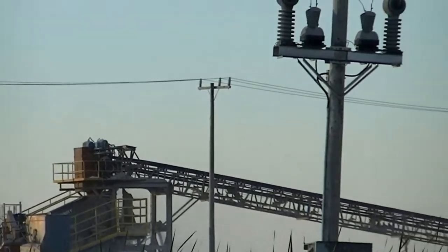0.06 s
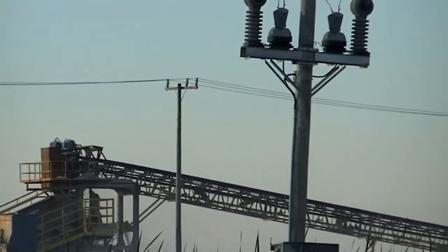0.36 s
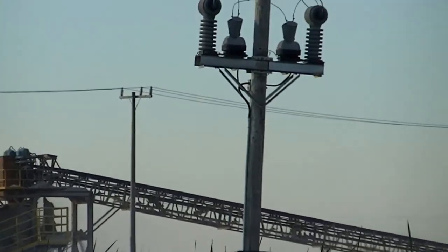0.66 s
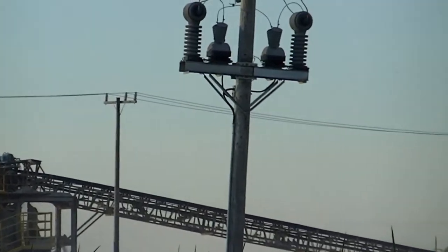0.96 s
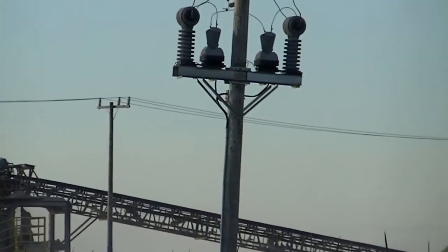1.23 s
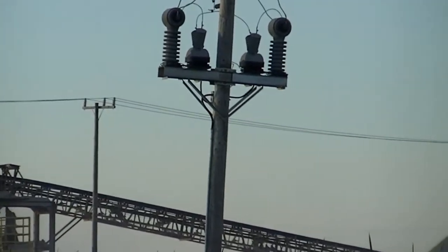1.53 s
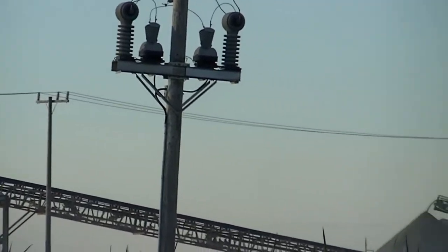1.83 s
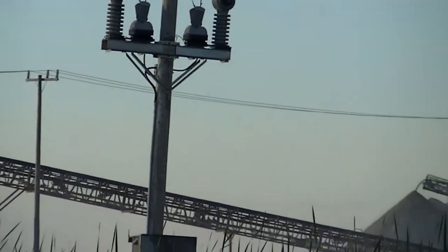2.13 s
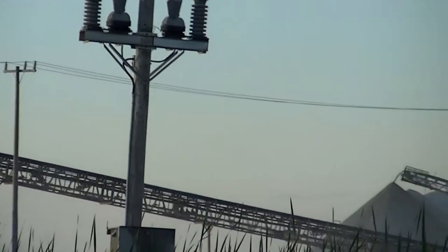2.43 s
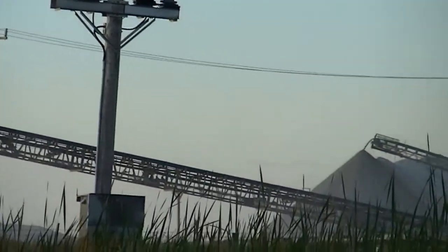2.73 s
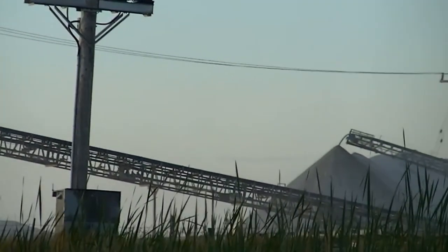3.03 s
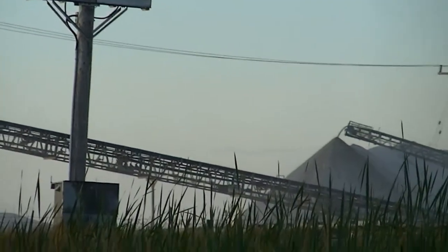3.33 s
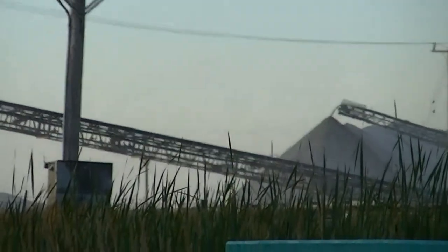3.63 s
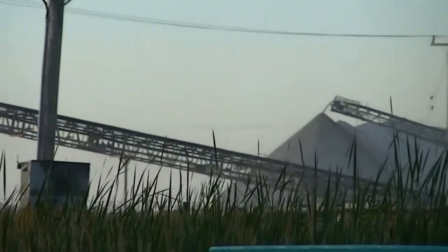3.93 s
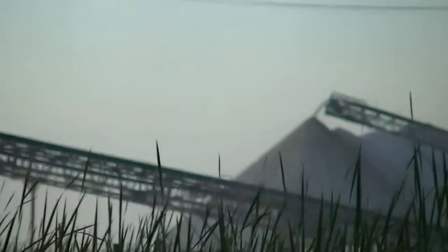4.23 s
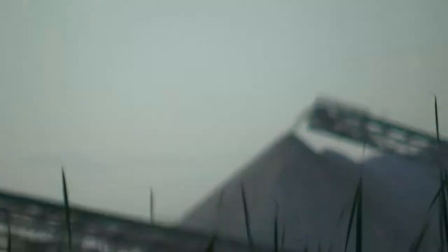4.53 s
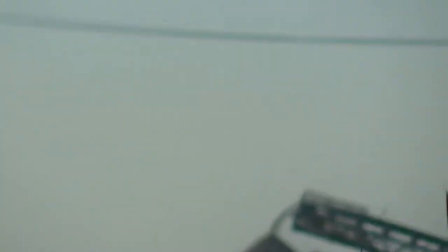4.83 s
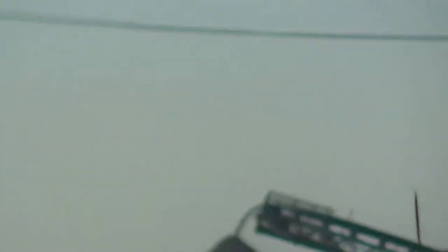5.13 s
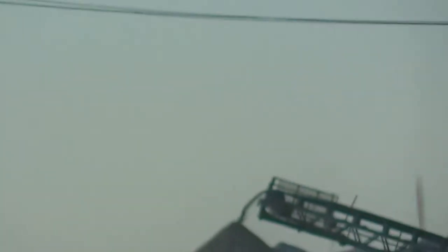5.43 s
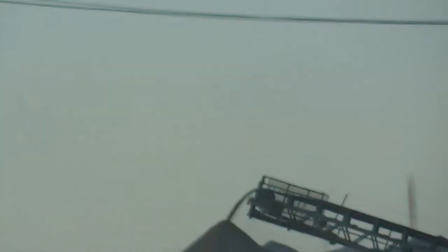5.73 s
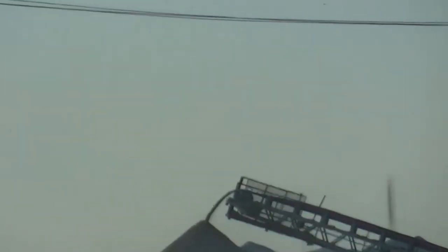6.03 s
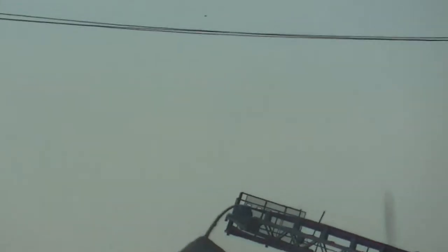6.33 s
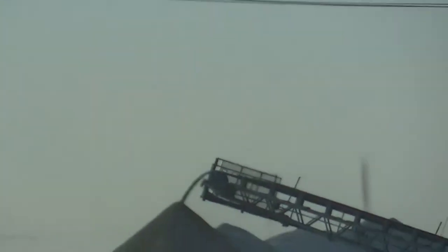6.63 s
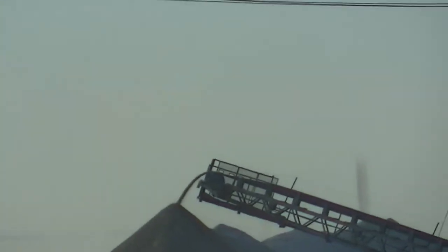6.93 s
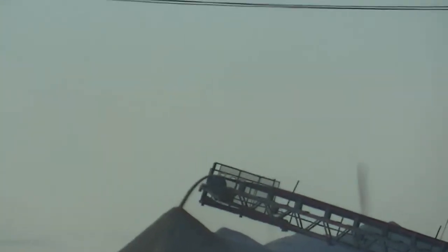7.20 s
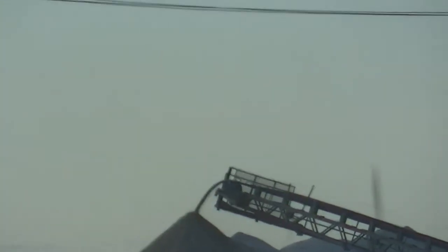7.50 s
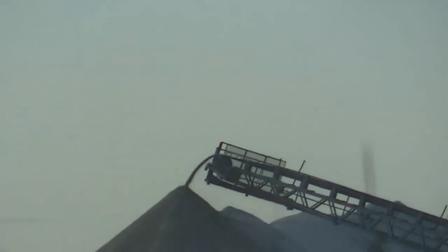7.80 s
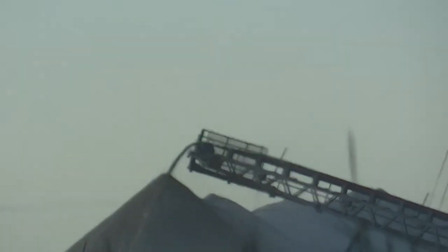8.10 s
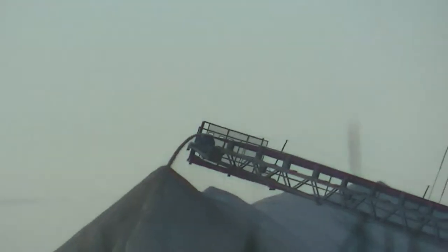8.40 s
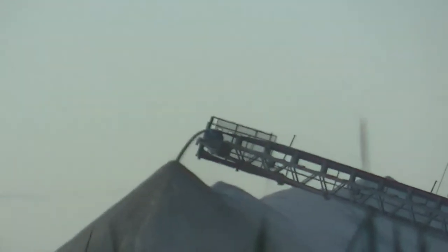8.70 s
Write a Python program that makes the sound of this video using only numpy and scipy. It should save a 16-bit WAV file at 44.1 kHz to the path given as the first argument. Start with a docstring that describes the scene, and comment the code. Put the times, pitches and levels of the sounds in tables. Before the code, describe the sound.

Outdoors at a gravel pit, machinery rumbles at a distance while stones clatter on a shaking screen and gravel and hissing grit pour off conveyor belts. A few pebbles ping and skitter. After about four seconds the din grows louder and narrows to the centre, with a faint high whine. Two small clicks sound near the microphone, the second with a rock's knock.

```python
"""Gravel plant across open ground

Steel frames rumble under the chug of stones on a shaking screen, while gravel and hissing grit pour off the
belts. Pebbles ping and skitter, a chute rings, brief midrange rings accent the clatter and one rock knocks on
the deck. After four seconds the whole sound grows louder and narrows to the centre, and a faint friction whine
rises with it. Two small clicks sound close by."""
import sys
import numpy as np
from scipy import signal
from scipy.fft import rfft, irfft
from scipy.io import wavfile

SR = 44100
rng = np.random.default_rng(int(sys.argv[2]) if len(sys.argv) > 2 else 0)


def master(y):
    """Save y as 16-bit WAV."""
    cut = np.clip(np.atleast_2d(y).T, -1, 1)
    pcm = np.round(cut * 32767)  # scale
    wavfile.write(sys.argv[1], SR, pcm.astype(np.int16))


N = 386316
TIME = np.arange(N) / SR
HZ = np.maximum(np.arange(N // 2 + 1) * SR / N, 1)
SHAKE_HZ = 13.21   # throws of the screen per second

# Resonances. Each row: pitch in Hz, nominal width in Hz, relative level in dB.
FRAME_MODES = [(68, 140, -52), (131, 70, -35), (207, 42, -27), (270.6, 53, -23.5), (335.7, 64, -17)]   # the steel frames
WHINE_MODES = [(6241, 70, 0), (7408, 42, -8)]   # a thin whine, perhaps a dry roller
CHUTE_MODES = [(2317, 53, -2.5), (2534, 60, -2.5), (4186, 104, -12.5)]   # the steel plate of a chute
PEBBLE_MODES = [(4220, 390, -1), (4590, 320, 2), (5160, 330, -3.5)]   # skittering pebbles
DECK_MODES = [(437, 133, -15), (508.7, 122, -8.5), (598.4, 99, -2.5), (713, 232, -1.5), (854, 370, -10)]   # the deck of the screen
PANEL_MODES = [(1032, 205, -2), (1147, 123, 0), (1267, 127, -4)]   # its side panels

# Fader moves. Each row: time in seconds, level in dB.
WHINE_FADER = [(0, -82), (4.0, -80), (5.0, -70), (6.2, -69), (7.5, -71.5), (7.7, -67), (7.88, -67.5),
               (8.1, -73), (8.36, -68), (8.56, -65), (8.76, -68.5)]
CHUTE_FADER = [(0, -55), (4, -54), (5, -52), (7.1, -44.5), (7.5, -45), (8.76, -47.5)]
SCREEN_FADER = [(0, -40), (0.9, -41), (2.2, -41.5), (2.55, -41), (3.2, -41.5), (4.1, -40.5), (5.05, -36),
                (5.45, -35.5), (5.6, -34.5), (5.82, -35.5), (6.05, -37.5), (6.25, -37.5), (6.45, -36),
                (7.05, -36.5), (7.25, -34.5), (8.55, -34), (8.76, -35)]   # the screen's clatter, swelling after four seconds
POUR_FADER = [(0, -38), (0.3, -39.5), (0.65, -39), (1.0, -39), (1.4, -40.5), (2.5, -40), (3.2, -41),
              (3.7, -41), (4.45, -37.5), (5.1, -36), (5.5, -36), (6.3, -35.5), (7.3, -36), (7.7, -34.5),
              (8.3, -35), (8.76, -35.5)]
SIDE_FADER = [(0, 3.5), (3.8, 3.5), (5.0, -28), (8.76, -33)]   # closes the stereo image

# Tone of what differs between the ears. Each row: frequency in Hz, gain in dB.
SIDE_EQ = [(40, -21), (250, -11), (600, -46), (1100, -56), (1450, -12), (2200, -14.5), (3200, -32.5),
           (5000, -18), (8000, -35), (15000, -26)]
# Handfuls of pebbles on the pile. Each row: centre in seconds, length in seconds, level in dB.
PEBBLE_RATTLES = [(.53, 0.045, -50), (.965, .05, -48), (2.44, 0.25, -55), (7.48, 0.14, -47),
                  (7.846, .12, -50), (8.04, .07, -53)]
# Single stones ringing out of the stream. Each row: start in seconds, pitch in Hz, level in dB.
STONE_PINGS = [(.527, 4565, -34), (.955, 5130, -40), (.992, 1710, -29), (1.229, 2220, -27),
               (1.732, 4150, -34), (2.419, 4130, -34), (5.255, 4500, -30)]
# Small, close clicks. Each row: start in seconds, peak in dB.
CLOSE_CLICKS = [(3.15, -36), (5.0802, -24)]
# Their ring. Each row: pitch in Hz, relative level in dB, seconds to fade by 60 dB.
TAP_MODES = [(655, -1, 0.034), (1050, 1, .02), (1690, -3, 0.011), (2920, 4, .011), (3880, -1, .011),
             (4900, -3, 0.011), (5670, 0, 0.008), (7000, -8, .007), (8650, -11, 0.006), (10200, -22, .006),
             (11800, -18, .006)]
# Brief midrange rings in the screen's clatter. Each row: start in seconds, pitch in Hz, level in dB.
CLATTER_ACCENTS = [(.490, 595, -31), (1.290, 1110, -33), (1.593, 1119, -30), (1.735, 780, -30),
                   (1.798, 1033, -28), (2.485, 700, -34), (2.568, 755, -32), (2.632, 1004, -29),
                   (2.865, 1090, -29), (3.000, 596, -33), (3.778, 1010, -32), (6.575, 1170, -26),
                   (7.628, 1270, -25), (8.240, 990, -23)]
# How hard the screen chugs. Each row: time in seconds, depth from 0 to 1.
CHUG_DEPTH = [(0, .09), (1.2, .12), (1.6, .17), (2.7, .22), (3.8, .14), (6.0, .11), (7.2, .08), (8.76, .1)]
# Heavy clumps sliding against the side panels. Each row: centre in seconds, boost in dB.
PANEL_CLUMPS = [(1.09, 5), (4.32, 3), (4.68, 3), (6.58, 1.5), (8.55, 4.5)]
# Stone hitting stone, dulled by distance. Each row: frequency in Hz, relative level in dB.
POUR_SPECTRUM = [(300, -18), (900, -19.5), (1400, -14), (1900, -9.5), (2700, -7), (3300, -13.5),
                 (3800, -20), (4400, -15), (5300, -21.5), (6500, -31), (7500, -35), (8800, -47),
                 (11000, -53), (15500, -60)]
# Peaks and dips that colour the pour. Each row: centre in Hz, width in Hz, boost or cut in dB.
POUR_EQ = [(1512, 60, 5), (1586, 52, 4), (1690, 39, 4.5), (1862, 85, 6), (2142, 72, 4.5), (2276, 85, 2.5),
           (2990, 390, 3), (3450, 170, 3.5), (3780, 110, -2.5), (4156, 100, 3), (4510, 200, 2.5),
           (5300, 140, -3), (6570, 170, -3.8), (6720, 130, 2)]
# Pockets of fine grit spilling off the belt. Each row: centre in seconds, boost in dB.
GRIT_SPILLS = [(1.0, 1), (4.55, 0.5), (6.13, 0), (7.62, 0.5), (7.8, 1.5), (8.42, 0), (8.58, 2.5)]


def from_db(db):
    """Decibels to gain."""
    return 10 ** (np.asarray(db) / 20)


def unit_rms(x):
    """Scale to unit power."""
    return x / np.sqrt(np.mean(x ** 2) + 1e-20)


def curve(points, at=TIME):
    """Read a breakpoint curve, by default at every sample."""
    return np.interp(at, *np.transpose(points))


def eq_db(points):
    """Draw an EQ curve through the points on a log frequency axis."""
    hz, db = np.transpose(points)
    return np.interp(np.log(HZ), np.log(hz), db)


def bell(centre_s, length_s):
    """A smooth rise and fall, 1 at its top."""
    return np.exp(-(2 * (TIME - centre_s) / length_s) ** 2)


def surges(rows, length_s):
    """Brief bell-shaped boosts, in dB."""
    return sum(db * bell(s, length_s) for s, db in rows)


def resonance(hz, width_hz):
    """Complex response of one resonance, 1 at its top."""
    return 1 / (1 + 1j * (HZ ** 2 - hz ** 2) / (HZ * width_hz))


def drift(rate_hz):
    """A slow random wobble of unit power."""
    return unit_rms(irfft(rfft(rng.standard_normal(N)) / (1 + 1j * HZ / rate_hz) ** 2, N))


def impacts(per_s, spread_db):
    """Stones land at random moments, many small and a few large."""
    sizes = from_db(spread_db * np.minimum(rng.exponential(1, N), 4)) * rng.choice([-1, 1], N)
    return unit_rms(sizes * (rng.random(N) < per_s / SR))


def ringing(modes, excite):
    """Steep-sided resonances, each driven by an excitation of its own."""
    spectrum = sum(from_db(db) * resonance(hz, width) ** 2 * rfft(excite()) for hz, width, db in modes)
    return unit_rms(irfft(spectrum, N))


def short_rings(rows, t60, detune):
    """One brief ring of three close partials for each row."""
    out, age = np.zeros(N), TIME[:SR // 6]
    for s, hz, db in rows:
        partials = hz * (1 + detune * rng.uniform(-1, 1, (3, 1)))
        ring = np.sin(2 * np.pi * (partials * age + rng.random((3, 1)))).mean(axis=0)
        attack = 1 - np.exp(-age * hz / 2)   # two cycles to build up
        clink = ring * attack * from_db(db - 60 * age / t60)
        start = round(s * SR)
        out[start:start + len(clink)] += clink[:N - start]
    return out


def shake(depth, wander=0.15, sharpness=0.19):
    """The screen throws its load once a turn, some throws harder than others: a quick tremolo."""
    turn = 2 * np.pi * SHAKE_HZ * TIME
    pulse = np.cos(turn) + sharpness * np.cos(2 * turn)
    return unit_rms(1 + depth * (1 + wander * drift(3.5)) * pulse)


def ground_scatter(x, t60=0.055):
    """Ground and piles return a short, diffuse smear of the sound."""
    age = TIME[:SR // 5]
    echoes = rng.standard_normal(len(age)) * from_db(-60 * age / t60)
    return signal.fftconvolve(x, echoes / np.linalg.norm(echoes))[:N]


def frame_rumble(follows=0.55, trim_db=-43):
    """The frames lay down a low drone that swells about half as much as the screen."""
    level_db = follows * curve(SCREEN_FADER) + trim_db
    return from_db(level_db) * ringing(FRAME_MODES, lambda: rng.standard_normal(N))


def friction_whine(flicker_db=1.8):
    """Friction keeps two narrow resonances singing in unsteady spurts."""
    spurts = unit_rms(from_db(flicker_db * drift(12)))
    return from_db(curve(WHINE_FADER)) * spurts * ringing(WHINE_MODES, lambda: rng.standard_normal(N))


def steel_chute():
    """Stones tumble down a steel chute and keep its narrow modes ringing."""
    return from_db(curve(CHUTE_FADER)) * ringing(CHUTE_MODES, lambda: impacts(per_s=100, spread_db=1.5))


def pebble_rattles():
    """Each handful skitters over the pile in a quick swell of small, bright collisions."""
    swell = sum(from_db(db) * bell(s, length_s) for s, length_s, db in PEBBLE_RATTLES)
    return swell * ringing(PEBBLE_MODES, lambda: impacts(per_s=830, spread_db=3))


def stone_pings(count=420):
    """Stones that strike cleanly ring out of the stream: a few accents over a faint sprinkle."""
    moment, pitch, softness = rng.random((count, 3)).T
    starts = moment * TIME[-1]
    hz = 1600 * 2 ** (1.7 * pitch)
    db = curve(POUR_FADER, starts) + curve(POUR_SPECTRUM, hz) + 11 - 8 * softness
    accents = short_rings(STONE_PINGS, t60=0.065, detune=0.021)
    return accents + short_rings(zip(starts, hz, db), t60=0.13, detune=0.013)


def close_clicks(attack_s=0.0004, crack_db=-8, crack_t60=0.013):
    """Each light tap starts with a gritty crack and rings a few short modes, from knock up to tick."""
    out, age = np.zeros(N), TIME[:SR // 20]
    high_cut = signal.butter(4, 11500, fs=SR, output="sos")
    low_cut = signal.butter(2, 450, "high", fs=SR, output="sos")
    ring = sum((-1) ** k * from_db(db - 60 * age / t60) * np.sin(2 * np.pi * hz * age)
               for k, (hz, db, t60) in enumerate(TAP_MODES))
    crack = from_db(crack_db - 60 * age / crack_t60) * rng.standard_normal(len(age))
    attack = 1 - np.exp(-age / attack_s)
    tap = signal.sosfilt(low_cut, attack * (ring + signal.sosfilt(high_cut, crack)))
    for s, db in CLOSE_CLICKS:
        start = round(s * SR)
        out[start:start + len(tap)] += from_db(db) * tap / np.abs(tap).max()
    return out


def rock_knock(start_s=5.063, peak_db=-25.5, contact_t60=0.017):
    """One rock drops with a dull crunch and sounds the deck and the panels together."""
    contact = (TIME >= start_s) * from_db(-60 * np.abs(TIME - start_s) / contact_t60)
    knock = ringing(DECK_MODES + PANEL_MODES, lambda: contact * rng.standard_normal(N))
    return from_db(peak_db) * knock / np.abs(knock).max()


def clatter_accents():
    """Brief midrange rings accent the screen's random clatter."""
    return short_rings(CLATTER_ACCENTS, t60=0.14, detune=0.046)


def shaking_screen(deck_db=-4, panels_db=-2.5, uneven_db=0.04, rattle_db=0.63):
    """Stones fall back on the deck in time with the shaking and set the side panels ringing."""
    load = shake(curve(CHUG_DEPTH)) * from_db(uneven_db * drift(28))
    deck = ringing(DECK_MODES, lambda: load * impacts(per_s=4000, spread_db=2.2))
    panels = ringing(PANEL_MODES,
                     lambda: load * from_db(rattle_db * drift(9.2)) * impacts(per_s=3500, spread_db=2.2))
    clumps_db = surges(PANEL_CLUMPS, length_s=0.093)
    blend = from_db(deck_db) * deck + from_db(panels_db + clumps_db) * panels
    return from_db(curve(SCREEN_FADER)) * blend


def gravel_pour(gravel_trim_db=-0.32, grit_trim_db=-15, crossover_hz=4850, grit_follows=0.76):
    """A lumpy stream lands on the pile: gravel clatters, finer grit hisses above it and swells less."""
    peaks_db = sum(db * np.abs(resonance(hz, width)) ** 2 for hz, width, db in POUR_EQ)
    bass_cut = 1 / (1 + (320 / HZ) ** 4)   # small stones radiate no bass
    colour = from_db(eq_db(POUR_SPECTRUM) + peaks_db) * bass_cut
    gravel_share = 1 / (1 + (HZ / crossover_hz) ** 20)
    flow = shake(depth=0.033) * from_db(0.55 * drift(28))
    gravel_hits = flow * impacts(per_s=12000, spread_db=2.5)
    grit_hits = flow * from_db(0.5 * drift(31)) * impacts(per_s=25000, spread_db=2)
    gravel = unit_rms(irfft(rfft(gravel_hits) * colour * np.sqrt(gravel_share), N))
    grit = unit_rms(irfft(rfft(grit_hits) * colour * np.sqrt(1 - gravel_share), N))
    pour_db = curve(POUR_FADER)
    grit_db = pour_db.mean() + grit_follows * (pour_db - pour_db.mean())
    grit_db += surges(GRIT_SPILLS, length_s=0.11)
    return from_db(pour_db + gravel_trim_db) * gravel + from_db(grit_db + grit_trim_db) * grit


def scene(lean_left=0.14, scatter_send=0.36):
    """The plant sits a touch left, widened by scatter, then narrows; pings, whine and clicks are mono."""
    plant = shaking_screen() + clatter_accents() + rock_knock() + frame_rumble()
    plant += gravel_pour() + pebble_rattles() + steel_chute()
    spread = lean_left * plant + scatter_send * ground_scatter(plant)
    side = from_db(curve(SIDE_FADER)) * irfft(rfft(spread) * from_db(eq_db(SIDE_EQ)), N)
    mid = plant + stone_pings() + friction_whine() + close_clicks()
    return np.array([mid + side, mid - side])


def record(dry, hiss_db=-76, cutoff_hz=15400):
    """A faint hiss goes under the mix, and a steep low-pass takes off the very top."""
    hiss = from_db(hiss_db) * rng.standard_normal(N)
    low_pass = 1 / np.sqrt(1 + (HZ / cutoff_hz) ** 300)
    return irfft(rfft(dry + hiss) * low_pass, N)


dry = scene()
out = record(dry)
master(out)
```